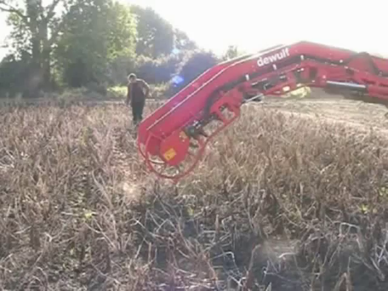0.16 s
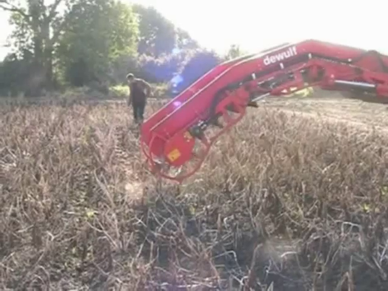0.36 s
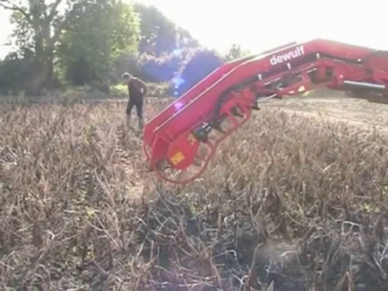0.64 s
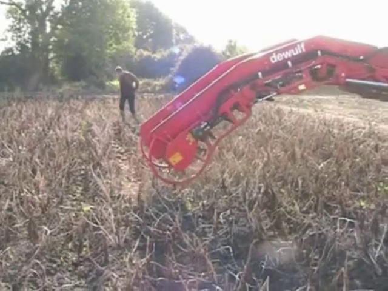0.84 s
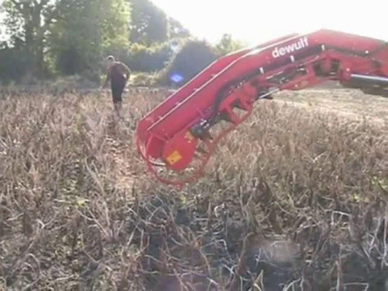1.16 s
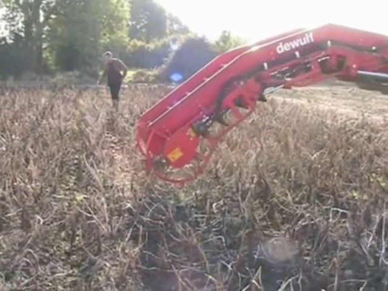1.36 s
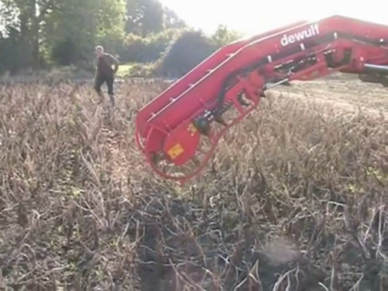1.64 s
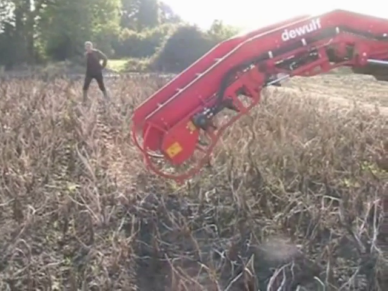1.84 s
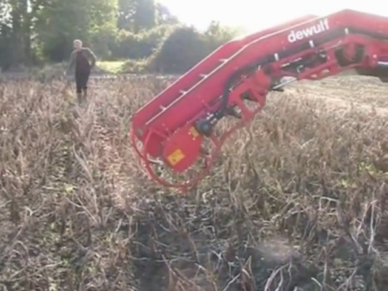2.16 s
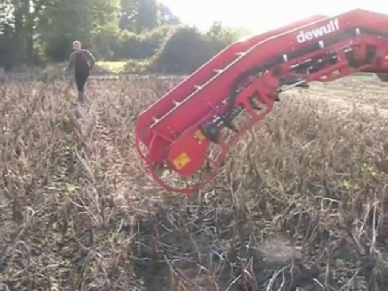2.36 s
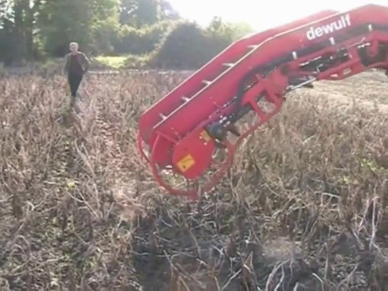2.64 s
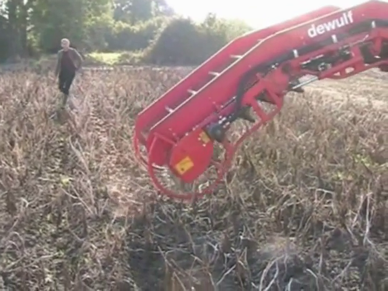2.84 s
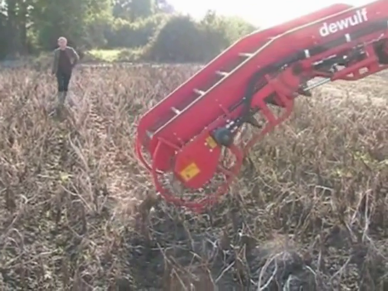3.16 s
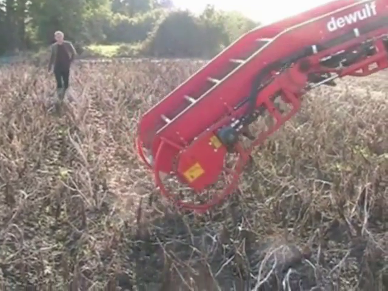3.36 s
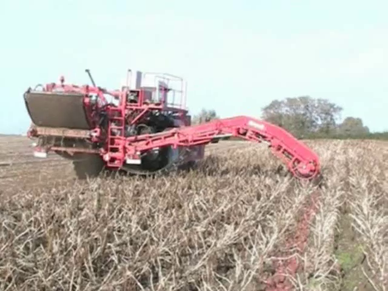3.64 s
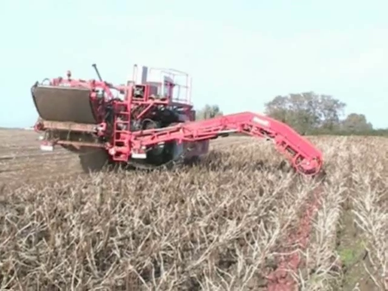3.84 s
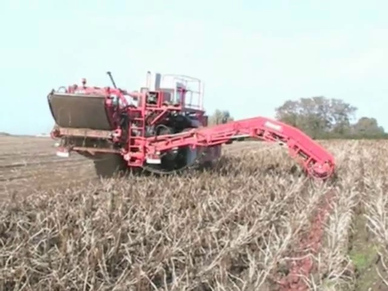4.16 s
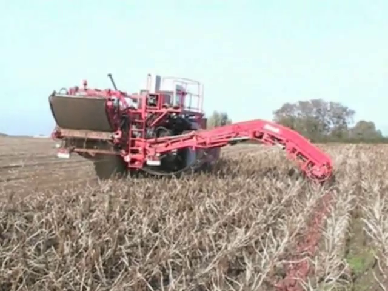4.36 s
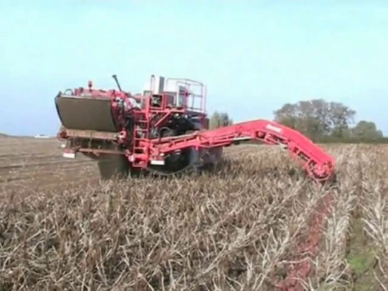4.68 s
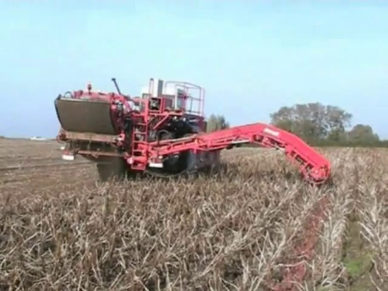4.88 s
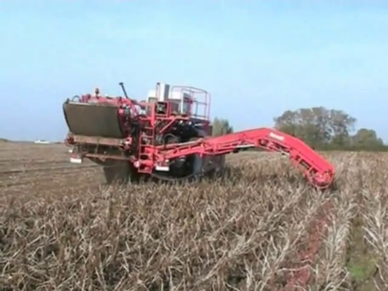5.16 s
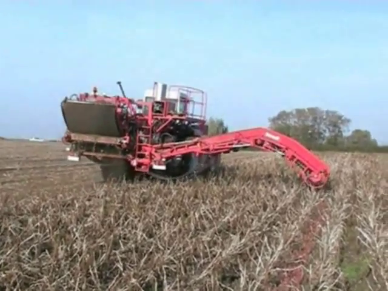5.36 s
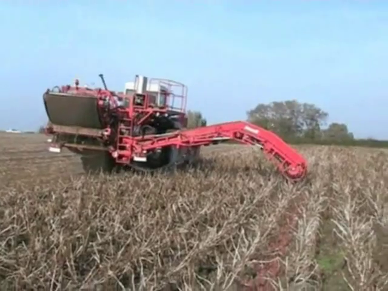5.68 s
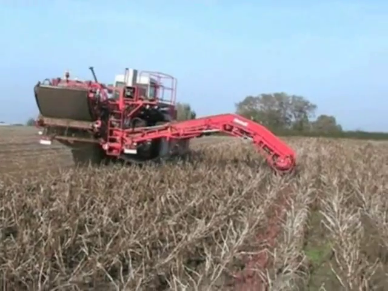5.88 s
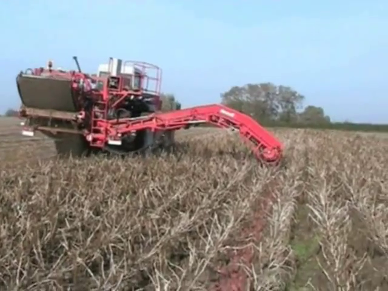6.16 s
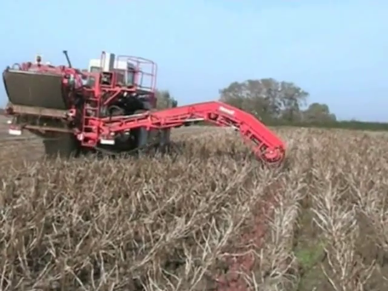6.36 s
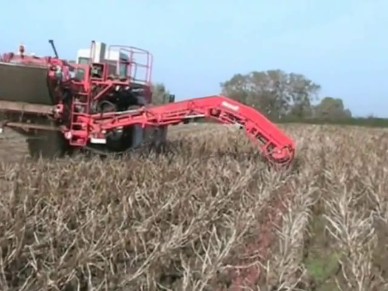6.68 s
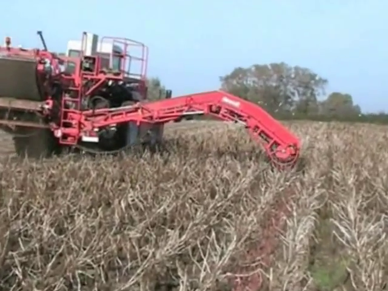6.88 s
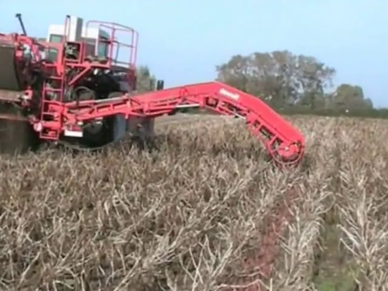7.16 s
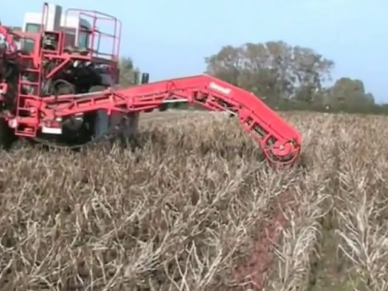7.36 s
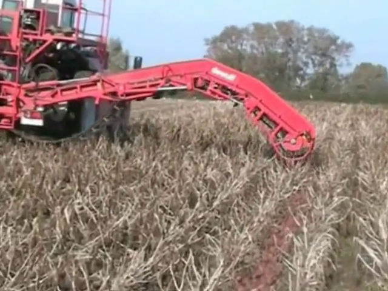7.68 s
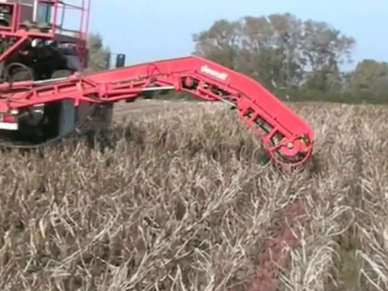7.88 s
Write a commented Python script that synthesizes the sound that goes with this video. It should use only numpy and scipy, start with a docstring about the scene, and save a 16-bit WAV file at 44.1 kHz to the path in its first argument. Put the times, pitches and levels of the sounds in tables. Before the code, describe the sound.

After a brief silence, a large diesel harvester starts at full volume close by: low steady drone, rough surging chain roar, metallic clatter and fluttering gear whine. Midway a short pop cuts to a second position, where the drone is deeper, with pulsing hiss. Body rumble and low wind grow toward the end. Outdoor field, stereo microphone.

```python
"""A six-cylinder diesel drones and hisses with each firing, driving a self-propelled potato harvester in a field.
Exhaust tones and bursts of noise follow its firings; pump and gear whines are tones at speeds tied to them.
Sieve chains roar as lumpy shaped noise and clatter as random knocks on ringing steel, amid field din and breeze.
It starts abruptly beside the elevator, then jumps with a pop to a second standpoint."""
import sys
import numpy as np
from scipy import signal
from scipy.fft import rfft, irfft, next_fast_len
from scipy.io import wavfile

SR = 44100
rng = np.random.default_rng(int(sys.argv[2]) if len(sys.argv) > 2 else 0)


def bounce(signal):
    """Save signal as a 16-bit WAV file at the path given by the first command-line argument."""
    frames = np.transpose(np.atleast_2d(signal))
    limited = np.clip(frames, -1, 1)
    pcm = np.round(limited * 32767).astype(np.int16)
    wavfile.write(sys.argv[1], SR, pcm)


N = 353682
TIME = np.arange(N) / SR
FFT_SIZE = next_fast_len(N + 4096)
BINS_HZ = np.maximum(np.fft.rfftfreq(FFT_SIZE, 1 / SR), 1)
START_S, JUMP_S = .129, 3.4893


def from_db(db):
    """Decibels to gain."""
    return 10 ** (np.asarray(db) / 20)


def rms_one(x):
    """Scale to unit rms."""
    return x / np.sqrt(np.mean(x ** 2) + 1e-20)


def noise():
    """White noise, the raw excitation."""
    return rng.standard_normal(N)


def in_time(rows):
    """Each column of a curve over time, joined by straight lines."""
    s, *columns = np.transpose(rows)
    return [np.interp(TIME, s, c) for c in columns]


def response(points):
    """Gain per frequency bin from (Hz, dB) points, straight on a log frequency axis."""
    hz, db = np.transpose(points)
    return from_db(np.interp(np.log(BINS_HZ), np.log(hz), db))


def filtered(x, gain):
    """Apply a gain per frequency bin."""
    return irfft(rfft(x, FFT_SIZE) * gain, FFT_SIZE)[..., :N]


def coloured(x, points, band):
    """Give white excitation a spectrum, with rms 1 inside the band (from Hz, to Hz)."""
    gain = response(points)
    inside = (BINS_HZ > band[0]) & (BINS_HZ < band[1])
    return filtered(rms_one(x), gain / np.sqrt(np.mean(gain ** 2 * inside)))


def drift(rate):
    """Slow random wander with spread 1, changing about rate times a second."""
    return rms_one(filtered(noise(), 1 / (1 + (BINS_HZ / rate) ** 2)))


def tone(turns):
    """A sinusoid of rms 1 from its phase in cycles."""
    return np.sqrt(2) * np.cos(2 * np.pi * turns)


def ring(clicks, hz, t60):
    """A unit click sets a sine of height 1 ringing, down 60 dB after t60 seconds."""
    r, w = from_db(-60 / (t60 * SR)), 2 * np.pi * hz / SR
    return signal.lfilter([0, np.sin(w)], [1, -2 * r * np.cos(w), r * r], clicks + 1e-18)


def resonance(x, hz, width_hz):
    """A steep-sided resonance, two equal poles of width_hz, whose centre may move; rms 1."""
    spin = np.exp(2j * np.pi * np.cumsum(hz * np.ones(N)) / SR)
    r = np.exp(-np.pi * width_hz / SR)
    # shift the centre down to zero, smooth, and shift back up
    smoothed = signal.lfilter([1], [1, -2 * r, r * r], x / spin)
    return rms_one((smoothed * spin).real)


def sharpened(sound, edge_db, edge_hz):
    """A steep treble shelf whose level moves in time."""
    treble = filtered(sound, 1 - 1 / (1 + (BINS_HZ / edge_hz) ** 20))
    return sound + (from_db(edge_db) - 1) * treble


def bump(at_s, width_s):
    """A smooth swell of height 1."""
    return np.exp(-((TIME - at_s) / width_s) ** 2)


def panned(ports, pan_db):
    """Lean a stereo sound to the left by pan_db."""
    return ports * from_db(pan_db * np.array([[.5], [-.5]]))


# Even changes beside the elevator as the machine creeps up, brightness being the top of the chain roar.
# Each named part: level or offset at the start in dB, change in dB per second.
CREEP_LEVELS = {"note": (-27.5, 0.34), "overtones": (-24, 0.95), "hiss": (-29.5, -.3), "roar": (-21, -0.11),
                "brightness": (0.6, -0.74), "pump hum": (-2.5, 1.3)}


def creeping(part):
    """Level of a part in dB while the machine creeps towards the first standpoint."""
    start_db, db_per_s = CREEP_LEVELS[part]
    return start_db + db_per_s * TIME


# Even changes at the second standpoint as the machine draws nearer; pan is left minus right.
# Each named part: level or offset before the approach in dB, gain over the approach in dB.
APPROACH_LEVELS = {"upper overtones": (0, -2.5), "rumble": (-31.5, 6.8), "pan": (-0.6, 0.94),
                   "breeze": (-39, 13.7)}
APPROACH_FROM_S, APPROACH_TO_S = 4.5, 7.24


def approaching(part):
    """Level of a part in dB while the machine draws nearer to the second standpoint."""
    before_db, gained_db = APPROACH_LEVELS[part]
    progress = np.clip((TIME - APPROACH_FROM_S) / (APPROACH_TO_S - APPROACH_FROM_S), 0, 1)
    return before_db + gained_db * progress


# Spectrum of the din from the field around. Each row: frequency in Hz, relative density in dB per Hz.
AMBIENCE_SPECTRUM = [(120, -8), (260, 8.5), (480, 5.5), (680, -6.5), (900, 3.5), (1250, -9.5), (2200, -9),
                     (4500, -9.5), (6000, -17), (7000, -21.5), (9000, -35.5), (11000, -61)]


def ambience(level_db):
    """The din comes back from all over the field as noise that differs at each port."""
    return from_db(level_db) * coloured(rng.standard_normal((2, N)), AMBIENCE_SPECTRUM, (120, 9000))


# Spectrum of breeze on the microphone ports. Each row: frequency in Hz, relative density in dB per Hz.
BREEZE_SPECTRUM = [(15, -27), (30, -19), (55, 3.5), (100, 3), (200, -10), (600, -27.5), (3000, -62)]


def breeze(level_db, gust_db):
    """Eddies push on one port while they pull, more weakly, on the other."""
    eddies = coloured(noise() * from_db(gust_db * drift(3)), BREEZE_SPECTRUM, (15, 600))
    return from_db(level_db) * np.array([eddies, -.85 * eddies])


def jump_pop(level_db, decay_s, tick_db):
    """A short pop marks the jump: a tick, and a step in pressure that dies away."""
    age = np.maximum(TIME - JUMP_S, 0)
    tick = from_db(tick_db) * np.exp(-age * SR)
    step = from_db(level_db) * np.exp(-age / decay_s)
    return -(step + tick) * (TIME >= JUMP_S)


# Treble roll-off of the microphone. Each row: frequency in Hz, gain in dB.
MICROPHONE_TREBLE = [(5800, 0.5), (6400, -4.5), (6900, -10.5), (8200, -13), (9200, -18.5), (11000, -30),
                     (12800, -46)]


def microphone(direct, balance, lag_us, bass_lead, scatter_db):
    """The left port hears later but leads in the bass (radians); field scatter differs between the ports."""
    age = TIME[:SR // 10]
    echoes = rng.standard_normal(len(age)) * np.exp(-age / 0.02)
    scatter = from_db(scatter_db) * rfft(echoes / np.linalg.norm(echoes), FFT_SIZE)
    # the balance and the bass lead are shared equally between the ports
    lean = np.sqrt(response(balance)) * np.exp(.5j * bass_lead / (1 + (BINS_HZ / 120) ** 6))
    delay = np.exp(-2j * np.pi * BINS_HZ * lag_us / 1e6)
    ports = np.array([(1 + scatter) * lean * delay, (1 - scatter) / lean])
    return filtered(direct, ports * response(MICROPHONE_TREBLE))


# Rumble of the body at the second standpoint. Each row: frequency in Hz, relative density in dB per Hz.
RUMBLE_SPECTRUM = [(60, -27.5), (110, -9), (140, -1), (172, 3), (215, -10), (300, -19.5), (800, -43)]


def body_rumble():
    """The body rumbles as low shaped noise that grows as the machine draws nearer."""
    return from_db(approaching("rumble")) * coloured(noise(), RUMBLE_SPECTRUM, (60, 800))


def panel(hz, width_hz):
    """One panel resonance kept ringing by the shaking frame; rms 1."""
    return rms_one(ring(noise(), hz, np.log(1000) / (np.pi * width_hz)))


# Resonances of sheet panels at the second standpoint.
# Each row: frequency in Hz, width in Hz, relative level in dB.
SHEET_PANELS = [(398, 18, -13.5), (455, 45, -14), (622, 18, -9), (716, 45, -12.5), (876, 33, -18),
                (1010, 60, -16), (1310, 110, -15.5)]
# Swell of the large panels, the ones tuned low. Each row: time in seconds, added level in dB.
LARGE_PANEL_SWELL = [(3.6, -3), (4.2, -3), (4.65, 1), (5.2, -4.5), (5.7, -3), (6.4, .5), (7.2, 3.5),
                     (7.8, 7.5)]
LARGE_PANEL_HZ = 500  # panels tuned below this are large


def sheet_panels():
    """The sheet panels ring; the large ones come and go, and end in a swell."""
    swell_db = in_time(LARGE_PANEL_SWELL)[0]
    return sum(from_db(db + swell_db * (hz < LARGE_PANEL_HZ)) * panel(hz, width)
               for hz, width, db in SHEET_PANELS)


# Resonances of the elevator's panels, which come and go as the machine creeps up.
# Each row: frequency in Hz, pole width in Hz, relative level at the start in dB, change in dB per second.
ELEVATOR_MODES = [(255, 30, -12.5, 0), (335, 50, -13, -.8), (380, 45, -7.5, -6), (560, 22, -14, -4),
                  (690, 80, -13, -2.5)]


def elevator_panels():
    """The elevator's panels ring, most of them fading as the machine moves."""
    return sum(from_db(db + db_per_s * TIME) * resonance(noise(), hz, width)
               for hz, width, db, db_per_s in ELEVATOR_MODES)


# Ringing modes of steel rods and guards. Each row: frequency in Hz, relative level in dB, t60 in seconds.
STEEL_MODES = [(324, -6.5, 0.049), (632, 4, 0.046), (715, -3, 0.022), (990, -0.5, 0.029),
               (1233, 0.5, 0.052), (1485, -10.5, 0.014), (1840, -22, 0.01), (2280, -2, 0.013),
               (3380, -3.5, 0.015), (4500, -10, 0.016)]


def clatter(per_s, spread_db):
    """Chain rods knock on rollers at random; every knock excites the steel modes differently."""
    at = np.flatnonzero(rng.random(N) < per_s / SR)
    force = from_db(spread_db * np.clip(noise()[at], -2, 2))
    out = np.zeros(N)
    for hz, db, t60 in STEEL_MODES:
        clicks = np.zeros(N)
        clicks[at] = force * noise()[at]
        out += from_db(db) * ring(clicks, hz, t60)
    return rms_one(out)


def chain_roar(spectrum, lumpy_db, grain_db):
    """Countless contacts of chain and soil merge into a roar that comes in lumps."""
    contacts = noise() * from_db(lumpy_db * drift(28) + grain_db * drift(220))
    return coloured(contacts, spectrum, (450, 1900))


# Surges of the roar with the soil on the chains. Each row: time in seconds, added level in dB.
SOIL_SURGE = [(.4, 0), (.55, 1.3), (.72, -1.2), (.98, 1.3), (1.17, -.8), (1.58, .5), (1.72, -1.3),
              (1.95, .3), (2.3, .2), (2.42, -1.2), (2.85, .7), (3.2, -.6)]
SHAKES_PER_FIRING = .295


def surging(firings, shake_db, throb_db):
    """Roar gain: slow surges, the regular sieve shake, and a throb four times per crankshaft turn."""
    shake = shake_db * tone(SHAKES_PER_FIRING * firings)
    throb = throb_db * tone(firings * 4 / 3)
    return from_db(in_time(SOIL_SURGE)[0] + shake + throb)


# Roar of chains, soil and panels from beside. Each row: frequency in Hz, relative density in dB per Hz.
ROAR_SPECTRUM_BESIDE = [(25, -34), (60, -8.5), (100, -1.5), (160, 5), (210, 3), (250, 9.5), (320, 5.6),
                        (385, 5), (480, -.5), (620, .5), (720, 1.5), (880, -2.5), (1100, -2), (1500, -3),
                        (2000, -6.5), (3300, -9.5), (6000, -24)]


def roar_beside(firings):
    """Close chains roar, clatter and surge, with the elevator's panels ringing along."""
    chains = from_db(-2.1) * chain_roar(ROAR_SPECTRUM_BESIDE, lumpy_db=1.1, grain_db=0.07)
    chains = chains + from_db(-12.0) * clatter(per_s=80, spread_db=0.0) + elevator_panels()
    gain = from_db(creeping("roar")) * surging(firings, shake_db=.35, throb_db=.3)
    return gain * sharpened(chains, creeping("brightness"), edge_hz=750)


# The roar at the second standpoint. Each row: frequency in Hz, relative density in dB per Hz.
ROAR_SPECTRUM_SECOND = [(25, -31), (60, -8.5), (110, -1.5), (170, 2.5), (220, 1.5), (340, -1.5),
                        (400, -0.5), (560, -3), (760, -2.5), (950, -2), (1250, -3.5), (1700, -6),
                        (2400, -6.5), (6000, -22.5)]
# Its loudness there. Each row: time in seconds, level in dB.
ROAR_LEVEL_SECOND = [(3.5, -23), (5.2, -24.5), (7.3, -25.5), (7.9, -23.6)]


def roar_second():
    """At the second standpoint the chains roar and clatter, with sheet panels ringing along."""
    chains = from_db(-2.5) * chain_roar(ROAR_SPECTRUM_SECOND, lumpy_db=0.86, grain_db=1.0)
    chains = chains + from_db(-12.0) * clatter(per_s=80, spread_db=1.0)
    return from_db(in_time(ROAR_LEVEL_SECOND)[0]) * (chains + from_db(-1.5) * sheet_panels())


# Belt-driven rotors and fans.
# Each row: multiple of the firing rate, level beside in dB, level at the second standpoint in dB.
ROTOR_HUMS = [(.886, -35, -39), (5.87, -41.5, -59)]


def rotors(firings, column):
    """Hum of the driven shafts; the slowest lies just under the firing note and beats against it."""
    return sum(from_db(row[column]) * tone(row[0] * firings) for row in ROTOR_HUMS)


# Harmonics of the hydraulic pump.
# Each row: multiple of the piston rate, base level beside in dB, base level at the second standpoint in dB.
PUMP_HARMONICS = [(1, -36.5, -37), (2, -37.5, -38.3), (3, -49, -43.5), (4, -43, -47), (6, -40.7, -57),
                  (7, -43, -46), (8, -49, -49.5)]
# Swell of its whistle, the upper harmonics. Each row: time in seconds, added level in dB.
WHISTLE_SWELL = [(.2, 2.5), (1.4, 3.5), (1.9, -.5), (2.3, 1), (2.65, -5), (2.9, 1.5), (3.45, -2.5),
                 (3.55, 4), (3.9, 6.5), (4.05, -2), (4.5, -2), (4.7, 2), (6.3, 2), (7.2, -4)]
PUMP_PER_FIRING, WHISTLE_FROM = 4.25, 6  # piston strokes per firing; first whistling harmonic


def pump(firings, column, hum_db):
    """Piston ripple wavers with the oil pressure; low harmonics hum, high ones whistle and swell together."""
    strokes = PUMP_PER_FIRING * firings + 0.02 * drift(9)
    whistle_db = in_time(WHISTLE_SWELL)[0]
    out = np.zeros(N)
    for row in PUMP_HARMONICS:
        swell_db = whistle_db if row[0] >= WHISTLE_FROM else hum_db
        out += from_db(row[column] + swell_db + 2.4 * drift(5.6)) * tone(row[0] * strokes)
    return out


# Gear whine, swelling and easing with the load on the drive. Each row: time in seconds, level in dB.
WHINE_LEVEL = [(.2, -42), (.36, -30), (.48, -37), (.62, -29.5), (.72, -34.5), (.86, -26.8), (1.02, -30),
               (1.35, -39), (1.52, -33), (1.67, -38), (1.79, -30), (1.845, -34.5), (1.91, -25.7),
               (2.02, -38), (2.2, -33), (2.39, -39), (2.53, -29.5), (2.75, -28.7), (2.85, -36.5),
               (3.08, -37.5), (3.2, -28.5), (3.4, -29.7), (3.55, -35.5), (3.95, -32), (4.08, -39.5),
               (4.8, -38), (5.0, -42), (5.5, -39.5), (5.63, -31), (6.3, -34), (6.8, -40), (7.1, -38),
               (7.4, -46)]
# Sidebands that uneven teeth put round the whine.
# Each row: shaft orders from the mesh, base level beside in dB, base level at the second standpoint in dB.
MESH_SIDEBANDS = [(-4, -44.5, -58), (-2, -47, -45), (-1, -42, -52), (1, -52, -48), (2, -43.5, -50)]
TEETH_PER_TURN, CASING_HZ, CASING_WIDTH_HZ = 68, 2163, 230
SIDEBANDS_FOLLOW, WHINE_USUAL_DB = .4, -33  # share of the whine's swing about its usual level they take


def gears(firings, column, casing_db, flutter_db, throb_db):
    """Tooth mesh flutters and throbs with the firings, flanked by sidebands, over the ring of its casing."""
    turns = firings / 3  # six cylinders fire three times per turn
    mesh = TEETH_PER_TURN * turns + .02 * drift(25)
    whine_db = in_time(WHINE_LEVEL)[0]
    whine = from_db(whine_db + flutter_db * drift(14) + throb_db * tone(firings)) * tone(mesh)
    sidebands = sum(from_db(row[column] + 2 * drift(6)) * tone(mesh + row[0] * turns + .15 * drift(3))
                    for row in MESH_SIDEBANDS)
    follow = from_db(SIDEBANDS_FOLLOW * (whine_db - WHINE_USUAL_DB))
    casing = from_db(casing_db) * resonance(noise(), CASING_HZ, CASING_WIDTH_HZ)
    return whine + follow * sidebands + casing


BURST_LAG = .11  # firing cycles after the crest of the firing note


def firing_hiss(firings, spectrum, depth_db, uneven_db, rough_db, shaft_db):
    """Hiss bursts a little after the crest of the firing note, in a pattern tied to the crankshaft."""
    late = firings - BURST_LAG
    burst_db = depth_db * (tone(late) + 0.3 * tone(2 * (late - .06)))
    alternation_db = uneven_db * tone(firings / 2)
    shaft_pattern_db = shaft_db * (tone(firings * 4 / 3) + .5 * tone(firings * 2 / 3))
    gas = noise() * from_db(burst_db + alternation_db + shaft_pattern_db + rough_db * drift(64))
    return coloured(gas, spectrum, (3600, 6500))


# Firing hiss at the second standpoint. Each row: frequency in Hz, relative density in dB per Hz.
HISS_SPECTRUM_SECOND = [(800, -27), (2500, -14.5), (3550, -6), (3880, -.3), (4550, -0.5), (5050, -5),
                        (5650, -8.5), (7000, -18), (9000, -21), (12000, -29)]
# Its loudness. Each row: time in seconds, level in dB.
HISS_LEVEL_SECOND = [(3.63, -25), (3.72, -29.6), (4.0, -25.6), (4.25, -24.5), (4.38, -27.8), (4.65, -26.4),
                     (4.8, -26.4), (5.17, -24.8), (5.45, -29), (5.8, -27.7), (6.35, -26), (6.6, -26.7),
                     (6.82, -26), (7.25, -33), (7.8, -32), (8.0, -28.5)]
# How deeply it pulses with the firings. Each row: time in seconds, depth in dB.
HISS_PULSE_DEPTH = [(3.65, 2.7), (4.1, 2.0), (4.7, 2.2), (5.1, 2.6), (5.6, 2.6), (5.85, 2.1), (6.3, 2.7)]
# The top of the hiss. Each row: time in seconds, shelf gain in dB.
HISS_TOP = [(3.55, 0.5), (3.95, 4.5), (4.25, 1), (4.6, 1), (5.3, .8), (5.85, -4), (6.3, .7), (6.75, -.5),
            (7.9, 1.8)]
# A resonance wandering in its middle. Each row: time in seconds, centre frequency in Hz.
HISS_RING_PATH = [(3.6, 4280), (3.95, 4050), (4.2, 3920), (4.65, 4170), (5.2, 4030), (5.5, 4200),
                  (6.0, 4100), (6.4, 4230), (6.9, 4130)]
HISS_RING_WIDTH_HZ, HISS_RING_DB = 600, -12.5  # pole width; level against the hiss


def hiss_second(firings):
    """Pulsing gas noise with a moving top and a wandering resonance."""
    bursts = firing_hiss(firings, HISS_SPECTRUM_SECOND, depth_db=in_time(HISS_PULSE_DEPTH)[0],
                         uneven_db=.45, rough_db=.7, shaft_db=.4)
    ringing = from_db(HISS_RING_DB) * resonance(bursts, in_time(HISS_RING_PATH)[0], HISS_RING_WIDTH_HZ)
    shaped = sharpened(bursts, in_time(HISS_TOP)[0], edge_hz=5000)
    return from_db(in_time(HISS_LEVEL_SECOND)[0]) * (shaped + ringing)


# Short bark of each firing. Each row: frequency in Hz, relative density in dB per Hz.
BARK_SPECTRUM = [(250, -20), (550, 0), (1200, -1), (2000, -12), (4000, -30)]


def bark(firings, sharpness):
    """A brief puff of noise in the middle range at every firing."""
    gate = np.exp(sharpness * (np.cos(2 * np.pi * (firings - BURST_LAG)) - 1))
    return coloured(noise() * gate, BARK_SPECTRUM, (450, 1900))


# How unevenly the cylinders fire.
# Each row: time in seconds, dB added to the lines between the firing harmonics.
UNEVEN_FIRING = [(1.0, -2.5), (1.5, 2), (2.2, 1), (2.8, -5), (3.5, -5), (4.5, 1.5)]


def exhaust(firings, note_db, overtones_db, orders, waver_db, lag):
    """Pressure pulses, lopsided when overtones lag (cycles); uneven cylinders add lines between the orders."""
    uneven_db = in_time(UNEVEN_FIRING)[0]
    overtones = np.zeros(N)
    for k, db in orders:
        added_db = uneven_db * (k % 1 > 0) + approaching("upper overtones") * (k >= 3)
        overtones += from_db(db + added_db + waver_db * drift(2.2)) * tone(k * firings - lag)
    return from_db(note_db) * tone(firings) + from_db(overtones_db) * overtones


# Exhaust overtones at the second standpoint.
# Each row: multiple of the firing rate, dB against the overtone level.
EXHAUST_ORDERS_SECOND = [(3 / 2, -17.5), (2, -.3), (8 / 3, -21.5), (3, -9), (3.6, -23.5), (5, -21.5)]
# The drone there. Each row: time in seconds, firing note level in dB, overtone level in dB.
DRONE_LEVELS = [(3.5, -22.3, -23), (3.88, -19, -21.5), (4.2, -21, -22.5), (4.7, -19, -20.8),
                (5.25, -19.4, -22), (5.5, -17.5, -20), (5.95, -16.5, -20.3), (6.45, -18, -22.5),
                (7.0, -16.6, -21.7), (7.31, -17.3, -21.5), (7.42, -18.5, -28), (7.65, -19.3, -28.5),
                (7.9, -19, -26)]
# The drone turns rough as it weakens. Each row: time in seconds, flutter in dB.
DRONE_FLUTTER = [(7.25, .2), (7.55, 1.1)]


def exhaust_second(firings):
    """The exhaust at the second standpoint: a deep, fluttering drone with a bark at each firing."""
    note_db, overtones_db = in_time(DRONE_LEVELS)
    drone = exhaust(firings, note_db, overtones_db, EXHAUST_ORDERS_SECOND, waver_db=0.5, lag=1 / 4)
    flutter = from_db(in_time(DRONE_FLUTTER)[0] * drift(25))
    return drone * flutter + from_db(overtones_db - 19) * bark(firings, sharpness=4)


# Exhaust overtones from beside.
# Each row: multiple of the firing rate, dB against the overtone level.
EXHAUST_ORDERS_BESIDE = [(3 / 2, -6.8), (2, -0.44), (3, -10.5), (4, -21.5), (7, -22)]
# Firing hiss from beside. Each row: frequency in Hz, relative density in dB per Hz.
HISS_SPECTRUM_BESIDE = [(800, -31), (2500, -10), (3700, -2), (4250, 2), (5000, 0), (5800, -5), (7000, -4.5),
                        (9000, -4), (12000, -38)]
# Stereo balance beside, before panning. Each row: frequency in Hz, left minus right in dB.
STEREO_BESIDE = [(60, -0.5), (100, 1.5), (170, -1), (280, -2), (480, -5.2), (800, -4), (1350, -2),
                 (2270, -1), (3810, 1), (6400, 4.5)]


def beside(firings):
    """Next to the elevator the chains are loud and surge, and a rotor hum beats against the firing note."""
    engine = exhaust(firings, creeping("note"), creeping("overtones"), EXHAUST_ORDERS_BESIDE,
                     waver_db=0.7, lag=0)
    hiss = from_db(creeping("hiss")) * firing_hiss(firings, HISS_SPECTRUM_BESIDE, depth_db=0.9,
                                                   uneven_db=0, rough_db=1.0, shaft_db=.3)
    drives = rotors(firings, column=1) + pump(firings, column=1, hum_db=creeping("pump hum"))
    whine = gears(firings, column=1, casing_db=-41, flutter_db=.7, throb_db=0.3)
    machine = engine + hiss + roar_beside(firings) + drives + whine
    heard = microphone(machine, STEREO_BESIDE, lag_us=43.8, bass_lead=0.51, scatter_db=-25.5)
    return panned(heard, pan_db=-1.75) + ambience(level_db=-36.5) + breeze(level_db=-42.0, gust_db=3.0)


# Stereo balance at the second standpoint, before panning.
# Each row: frequency in Hz, left minus right in dB.
STEREO_SECOND = [(60, 0), (100, 0.5), (170, -1), (280, -1.5), (480, -1.8), (800, -2), (1350, -0.6),
                 (2270, -1), (3810, 0), (6400, -1)]
# a buffet of wind hits the ports, and the whole sound dips briefly just after it
BUFFET_S, BUFFET_WIDTH_S, BUFFET_DB = 7.48, 0.028, 10
DIP_S, DIP_WIDTH_S, DIP_DB = 7.61, .1, -2.5


def second_standpoint(firings):
    """Deep drone and pulsing hiss; as the machine draws nearer, the drone dulls and the body rumbles."""
    drives = rotors(firings, column=2) + pump(firings, column=2, hum_db=0)
    whine = gears(firings, column=2, casing_db=-39.5, flutter_db=.8, throb_db=1.0)
    machine = exhaust_second(firings) + hiss_second(firings) + roar_second() + body_rumble() + drives + whine
    heard = microphone(machine, STEREO_SECOND, lag_us=27.2, bass_lead=0.62, scatter_db=-24)
    buffet = from_db(BUFFET_DB * bump(BUFFET_S, BUFFET_WIDTH_S))
    wind = breeze(approaching("breeze"), gust_db=2.5) * buffet
    dip = from_db(DIP_DB * bump(DIP_S, DIP_WIDTH_S))
    return (panned(heard, approaching("pan")) + ambience(level_db=-45) + wind) * dip


# Engine speed: it hunts a little, sags under load, then picks up.
# Each row: time in seconds, firings per second.
ENGINE_SPEED = [(.5, 95.4), (.9, 95.05), (1.15, 95.3), (1.42, 94.75), (1.95, 95.35), (2.7, 95.0),
                (2.95, 95.35), (3.45, 95.15), (3.52, 94.45), (3.9, 94.5), (4.17, 93.55), (4.45, 94.0),
                (4.7, 93.85), (5.35, 94.1), (6.6, 95.15), (6.93, 95.06), (7.38, 96.85), (7.8, 96.6)]


def scene():
    """Silence, then one standpoint after the other with no fade between, all on one running engine."""
    firings = np.cumsum(in_time(ENGINE_SPEED)[0]) / SR
    onset = np.clip((TIME - START_S) / .001, 0, 1)
    standpoints = np.where(TIME < JUMP_S, beside(firings), second_standpoint(firings))
    return standpoints * onset + jump_pop(level_db=-14, decay_s=.006, tick_db=-1)


def record(dry):
    """The top is cut steeply, 70 dB down from 16 kHz."""
    return signal.sosfilt(signal.cheby2(12, 70, 16000, fs=SR, output="sos"), dry)


dry = scene()
out = record(dry)
bounce(out)
```